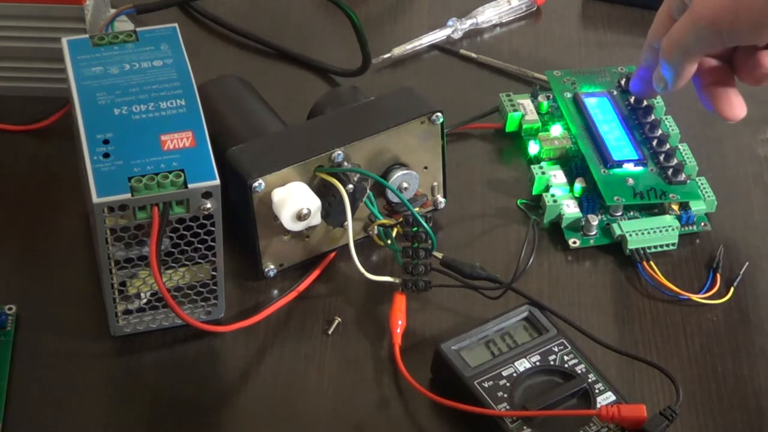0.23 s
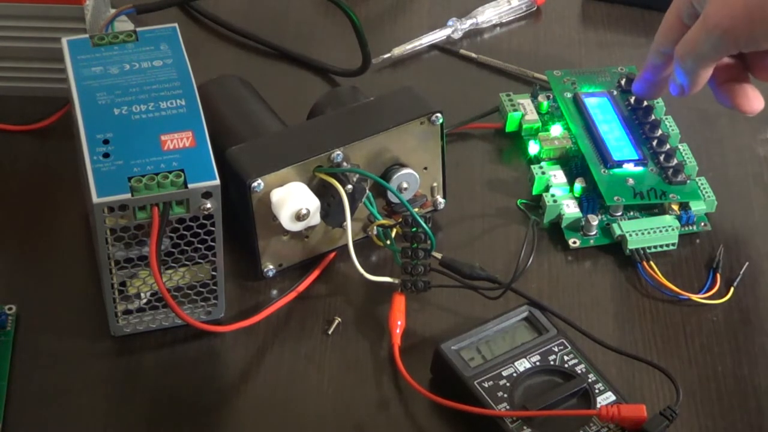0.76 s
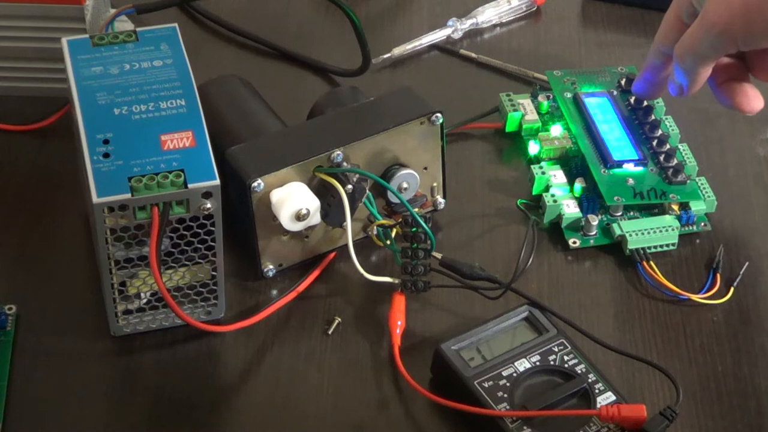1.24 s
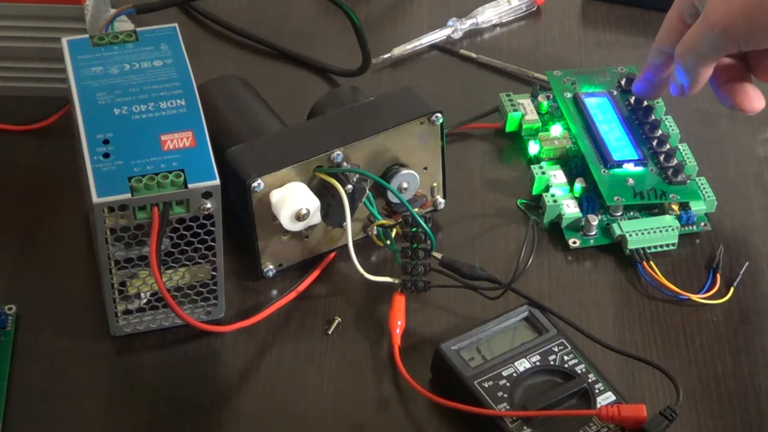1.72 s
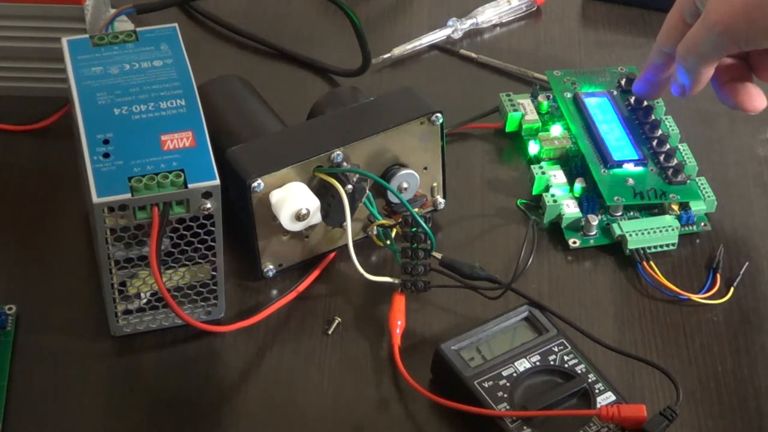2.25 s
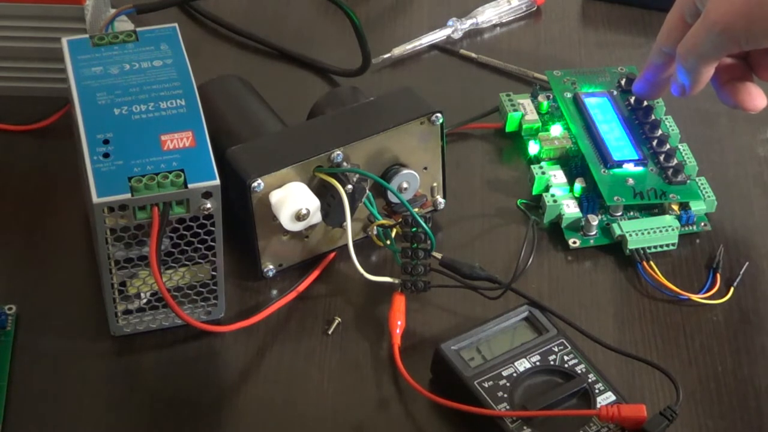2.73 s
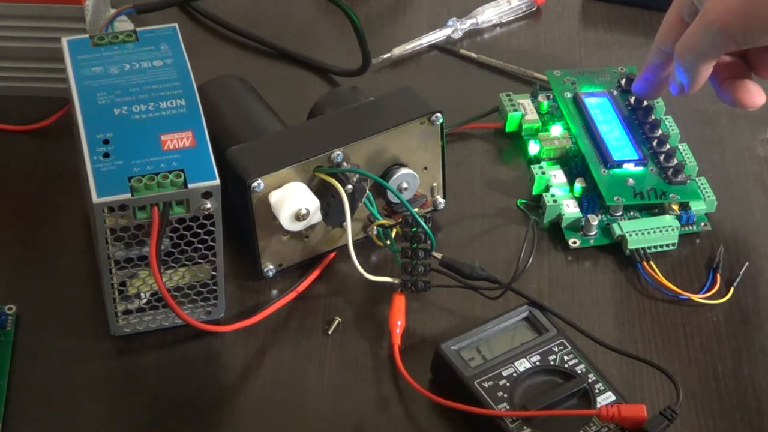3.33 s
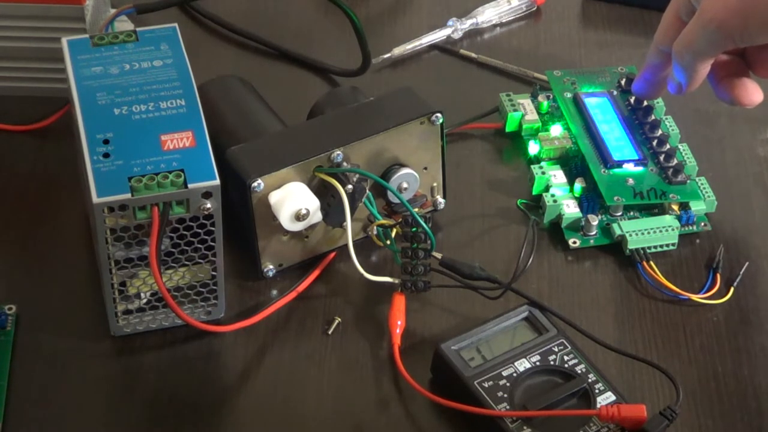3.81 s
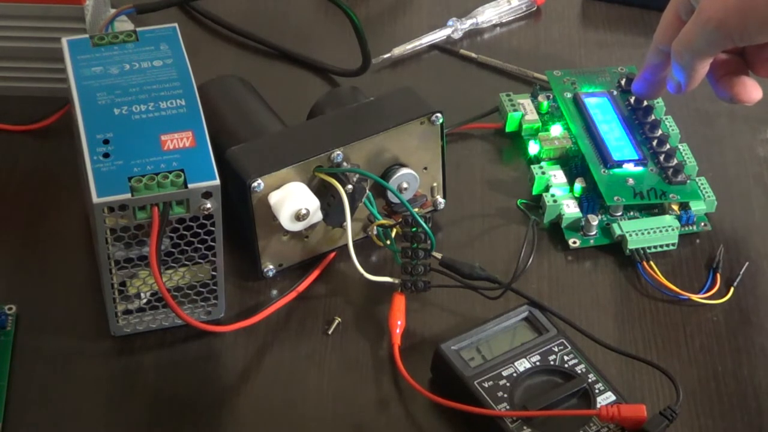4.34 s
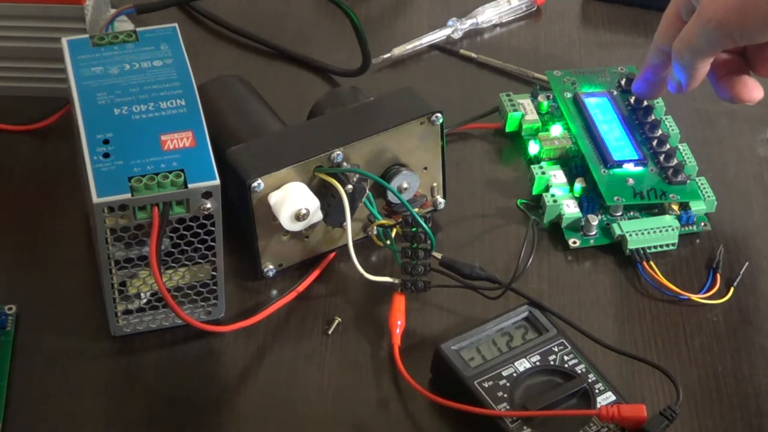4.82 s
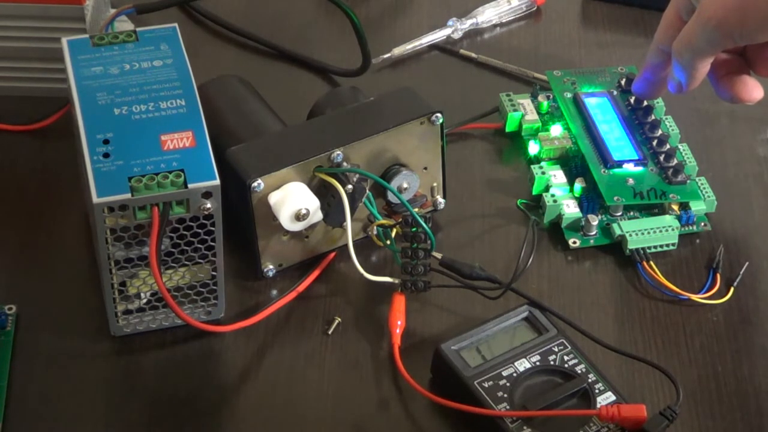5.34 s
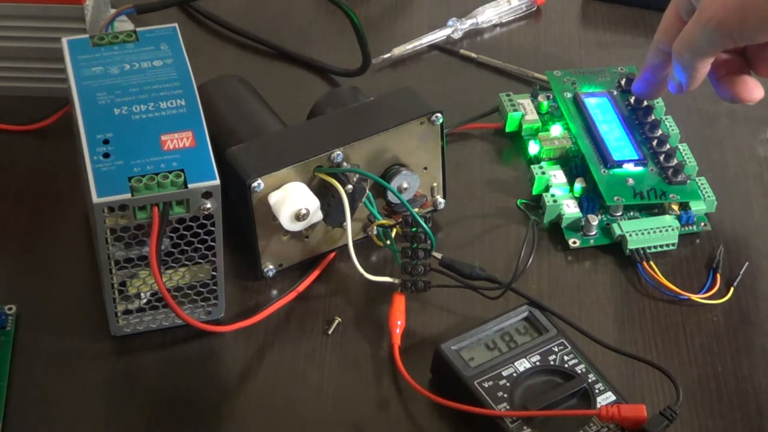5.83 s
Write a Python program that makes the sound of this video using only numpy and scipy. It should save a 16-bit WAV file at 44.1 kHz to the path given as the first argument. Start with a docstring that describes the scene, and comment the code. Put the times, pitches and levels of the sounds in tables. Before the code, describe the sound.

A small electric gear motor starts with a knock, runs with a steady high whine and rattle, then clicks and winds down.

```python
"""On a workbench in a humming room, a small DC gear motor starts with a knock and runs for four seconds.
Its controller chops the current on and off very fast, which makes the coils sing. The gears rattle,
the brushes rasp and squeal on the commutator (the spinning contact), and the shaft's tones sound
through the housing. A sharp click ends the run, the shaft winds down, and a faint whine stays."""
import sys
import numpy as np
from scipy import signal
from scipy.fft import rfft, irfft, next_fast_len
from scipy.io import wavfile
from scipy.ndimage import map_coordinates

SR = 44100
rng = np.random.default_rng(int(sys.argv[2]) if len(sys.argv) > 2 else 0)


def master_out(mix):
    """Clip the mix to full scale and print it as 16-bit PCM to the path in sys.argv[1]."""
    frames = np.transpose(np.atleast_2d(mix))
    ceiling = np.clip(frames, -1, 1)
    pcm = np.round(ceiling * 32767).astype(np.int16)
    wavfile.write(sys.argv[1], SR, pcm)


N = 267907
ON_S, OFF_S = .3855, 4.508  # the power comes on, and starts to fall
TIME = np.arange(N) / SR


def amp(db):
    return 10 ** (np.asarray(db) / 20)

def unit(x):
    return x / np.sqrt(np.mean(x ** 2) + 1e-20)

def since(start):
    return np.maximum(TIME - start, 0)

def rise(start, time_s):
    """A climb from 0 to 1, fast at first and then slower."""
    return 1 - np.exp(-since(start) / time_s)

def decay(start, t60, attack):
    """The loudness of a blow: a quick rise, and a fade of 60 dB in t60 seconds."""
    return amp(-60 * since(start) / t60) * rise(start, attack)

def along(points, hz):
    """Read between the rows of a table, on a log scale."""
    f, v = np.transpose(points)
    return np.interp(np.log(hz + 1), np.log(f + 1), v)

def wobble(rate):
    """A smooth curve through `rate` random values a second."""
    return map_coordinates(rng.standard_normal(int(N * rate / SR) + 4), [TIME * rate])

def filtered(x, gain):
    """Turn each frequency up or down by gain(hz)."""
    m = next_fast_len(N + SR // 2)
    return irfft(rfft(x, m) * gain(np.fft.rfftfreq(m, 1 / SR)), m)[..., :N]

def shaped(x, curve):
    """Filter by a table of (frequency [Hz], gain [dB])."""
    return filtered(x, lambda hz: amp(along(curve, hz)))

def noise(spectrum):
    return unit(shaped(rng.standard_normal(N), spectrum))

def ring(notes, start, attack):
    """A struck object rings with several fading notes at once."""
    return sum(amp(db) * decay(start, t60, attack) * np.sin(2 * np.pi * hz * (TIME - start))
               for hz, db, t60 in notes)

def clatter(rate, spread_db):
    """Tiny random hits of uneven size, about `rate` a second."""
    hits = rng.random(N) < rate / SR
    return unit(hits * rng.standard_normal(N) * amp(spread_db * rng.standard_normal(N)))


# The hush of the room: (frequency [Hz], relative level [dB])
AIR_NOISE = [(12, -49), (20, -12), (115, -10.5), (305, -8), (361, -9), (414, -10.5), (1910, -17.5),
             (4290, -18.5), (13000, -26), (15400, -22)]
# How much that hush differs between the ears: (frequency [Hz], gain [dB])
AIR_WIDTH = [(60, -19), (200, -10), (400, -4), (800, 0.5), (2400, -1), (4400, -6), (8000, 2), (15000, -23)]

def air():
    """Room air: nearly the same in both ears in the bass, all around in the middle range."""
    mid = noise(AIR_NOISE)
    side = shaped(noise(AIR_NOISE), AIR_WIDTH)
    return amp(-54) * np.array([mid + side, mid - side])

# The room's low hum: (frequency [Hz], level [dB])
HUM_TONES = [(120.2, -65.5), (240.4, -69.5), (360.6, -59), (480.8, -75.5)]
# The thin whistle of electronics: (frequency [Hz], level [dB])
WHISTLE_TONES = [(15574, -70), (15622, -64), (15676, -69)]

def hum_and_electronics(chirp_hz=4350):
    """A steady hum, and electronics that whistle and chirp 25 times a second."""
    def tones(table, waver):
        return np.sqrt(2) * sum(amp(db) * np.sin(2 * np.pi * hz * TIME + waver * wobble(3.96))
                                for hz, db in table)
    bursts = np.sin(np.pi * 25 * TIME) ** 6
    chirps = amp(-61) * bursts * np.sin(2 * np.pi * chirp_hz * TIME + wobble(200))
    return tones(HUM_TONES, waver=.21) + tones(WHISTLE_TONES, waver=.1) + chirps

# How long the room echoes: (frequency [Hz], time to fade 60 dB [s])
ROOM_FADE = [(100, 0.45), (300, 0.56), (2000, 0.44), (6000, 0.42), (15000, 0.14)]

def room_echo(x):
    """A wash of echoes for each ear; each frequency dies at its own speed."""
    hz, t, hiss = signal.stft(rng.standard_normal((2, SR // 2)), SR, nperseg=256)
    tail = signal.istft(hiss * amp(-60 * t / along(ROOM_FADE, hz)[:, None]), SR, nperseg=256)[1]
    tail = tail + .4 * tail[::-1]  # both ears hear much the same echoes
    delayed = np.pad(x, (SR // 300, 0))
    return signal.fftconvolve(delayed[None], tail / np.linalg.norm(tail[0]), axes=1)[:, :N]

# How much the bench's echoes differ between the ears: (frequency [Hz], gain [dB])
BENCH_WIDTH = [(50, -28), (150, -18), (350, -12), (1200, -5), (3000, -10.5), (6000, -4), (13000, -38)]

def spread(x, lead_s=.000012):
    """The left ear is slightly nearer; echoes off the bench reach the two ears differently."""
    echoes = rng.standard_normal(SR // 80) * np.linspace(1, 0, SR // 80)
    side = shaped(signal.fftconvolve(x, echoes / np.linalg.norm(echoes))[:N], BENCH_WIDTH)
    lead = lambda hz: np.exp(1j * np.pi * hz * lead_s * np.array([[1], [-1]]) / (1 + (hz / 7000) ** 2))
    return filtered(x, lead) + np.array([side, -side])

def place(x, left_db, lead_rad):
    """Steady tones reach the left ear a little ahead, and louder or softer than the right."""
    sides = np.array([[1], [-1]]) / 2
    return amp(left_db * sides) * filtered(x, lambda hz: np.exp(1j * lead_rad * sides))

# The switch's ring: (frequency [Hz], relative level [dB], time to fade 60 dB [s])
SWITCH_NOTES = [(5900, -1, 0.024), (5820, 4, 0.029), (6780, 0, .03), (8100, -2, 0.018), (10300, -2, 0.013),
                (11600, -1, .006)]
# Its burst of noise: (frequency [Hz], relative level [dB])
SNAP_NOISE = [(1760, -41), (3000, -22), (5920, -7), (8520, -13), (9330, -8), (11700, -2), (13900, -11),
              (16000, -26)]

def switch_click(start=4.5173):
    """A hard, bright contact snaps as the power is cut."""
    snap = amp(-9) * noise(SNAP_NOISE) * decay(start, t60=.011, attack=.0002)
    return amp(-22) * ring(SWITCH_NOTES, start, attack=.0002) + snap

def low_thump(centre_s=.443, width_s=.0026):
    """One low thump with the knock, mostly in the right ear."""
    offset = (TIME - centre_s) / width_s
    return amp([[-29], [-11]]) * offset * np.exp(-offset ** 2 / 2)

# The gears take up their slack: (time [s], ring level [dB], thud level [dB])
GEAR_BLOWS = [(.437, -17, -12), (0.444, -36, -14.5), (0.4542, -37, -20), (0.485, -38, -29)]
# The gearbox rings on the bench: (frequency [Hz], relative level [dB], time to fade 60 dB [s])
BENCH_NOTES = [(113, -8, 0.08), (180, -9, 0.12), (268, -1.5, 0.6), (325.3, -4.5, 0.36), (348, -3, 0.19),
               (449, 0.5, 0.18), (539.6, -7, 0.28), (602, -13, 0.2), (856, -13.5, 0.18), (1050, -9.5, 0.26),
               (1417, -4.5, .06)]
# The dull noise of each blow: (frequency [Hz], relative level [dB])
THUD_NOISE = [(50, -33), (110, -16), (170, -9), (380, 2), (500, -3.5), (800, -15.5), (1400, -14.5),
              (2100, -23.5), (3500, -25), (6000, -34), (15000, -59)]

def gear_knock():
    """The gears slam home: a brief hard contact, a dull rattle, and the gearbox rocking on the bench."""
    sound = np.zeros(N)
    for start, ring_db, thud_db in GEAR_BLOWS:
        contact = decay(start, t60=.02, attack=.0012)
        rattle = decay(start, t60=.047, attack=.00065)
        sound += amp(thud_db) * noise(THUD_NOISE) * (contact + rattle)
        sound += amp(ring_db) * ring(BENCH_NOTES, start, attack=.0011)
    return sound

# The coils' tones: (multiple of the chopping rate, level at full current [dB], holding level [dB],
# how strongly the tone follows the current [exponent])
COIL_TONES = [(1, -37, -55, 1.3), (2, -53.5, -65, 0.81), (3, -50, -72, .45), (4, -67, -71, 1.0)]

def coil_whine(chop_hz=3438.7, flutter=.048):
    """Chopped current makes the coils sing; a weak holding current remains after the stop."""
    ramp_down = np.maximum(1 - since(OFF_S) / .34, 0)
    current = (.4 + .6 * rise(ON_S, time_s=.47)) * ramp_down
    whine = np.zeros(N)
    for k, drive_db, hold_db, power in COIL_TONES:
        level = amp(drive_db) * current ** power * (1 + flutter * wobble(40)) + amp(hold_db)
        whine += level * np.sin(2 * np.pi * k * chop_hz * TIME)
    return np.sqrt(2) * (TIME > ON_S) * whine

def coasting(stop_s=.34):
    """The share of speed left as friction stops the shaft, more gently towards the end."""
    return np.maximum(1 - since(OFF_S) / stop_s, 0) ** 1.25

def braking():
    """How hard the gears push back while the shaft winds down (0 to 1)."""
    return .77 * rise(OFF_S, time_s=.027)

def shaft_speed(run_hz=63.615, extra_hz=.16, settle_at_s=2.07):
    """Turns per second: a quick start, a slightly fast run that settles, a coast to rest."""
    extra = extra_hz * (1 - np.tanh((TIME - settle_at_s) / .12)) / 2
    return (run_hz + extra) * rise(ON_S, time_s=.03) * coasting()

def loudness(run_db, swell_db, swell_s, fade_power, brake_db):
    """A part of the motor's sound starts at once, swells to run_db, then fades with the speed."""
    db = run_db - swell_db * (1 - rise(ON_S, swell_s)) + brake_db * braking()
    return (TIME > ON_S) * amp(db) * coasting() ** fade_power

def brush_squeal(pitch_hz=3275):
    """The brushes chatter on the commutator in one wandering tone, which beats against the whine."""
    level = loudness(run_db=-39, swell_db=4, swell_s=.9, fade_power=.9, brake_db=-4)
    level *= amp(2.5 * wobble(18))
    return np.sqrt(2) * level * np.sin(2 * np.pi * pitch_hz * TIME + .8 * wobble(45) + 3 * wobble(6))

def low_pass(hz, split_hz=2300):
    """The gears fill the range below the split, the brushes the range above."""
    return 1 / np.sqrt(1 + (hz / split_hz) ** 8)

def gear_rattle(turns, speed):
    """The roughness lies along the teeth, so the rattle sinks in pitch as the shaft slows."""
    teeth = amp(-28.5) * clatter(rate=900, spread_db=2.5) + amp(-29) * rng.standard_normal(N)
    rattle = map_coordinates(filtered(teeth, low_pass), [turns * SR / speed.max()])
    level = loudness(run_db=-.28, swell_db=2.5, swell_s=.7, fade_power=.63, brake_db=2)
    return rattle * level * amp(.36 * wobble(14))

def brush_rasp(turns, throb=.31):
    """Two sparking brushes spit at switch-on, then make a rasp that swells twice a turn."""
    sparks = amp(-30.5) * clatter(rate=1500, spread_db=4) + amp(-29.5) * rng.standard_normal(N)
    level = loudness(run_db=0, swell_db=5, swell_s=.53, fade_power=1.3, brake_db=-2)
    flicker = amp(.98 * wobble(16) + wobble(90))
    rasp = sparks * (1 + throb * np.cos(4 * np.pi * turns)) * level * flicker
    spit = amp(-26.5) * rng.standard_normal(N) * decay(ON_S, t60=.03, attack=.0003)
    return filtered(rasp + spit, lambda hz: np.sqrt(1 - low_pass(hz) ** 2))

# Tones of the commutator and gears: (multiple of the shaft speed, relative level [dB])
SHAFT_TONES = [(3, -52), (7, -51), (10, -33), (14, -57), (20, -41), (30, -42), (40, -42), (49, -54),
               (60, -50), (72, -54), (80, -42), (81, -54), (82, -45), (83, -52), (84, -40), (85, -53),
               (86, -53), (88, -47), (89, -52), (90, -47), (98, -47), (99, -50), (100, -40), (110, -47),
               (112, -52), (116, -52), (159, -48), (195, -49)]
# How braking changes them: (multiple of the shaft speed, change at full braking [dB])
BRAKE_CHANGE = [(10, -1), (20, 5), (30, 5), (40, -5), (80, -8)]

def shaft_tones(turns):
    """Ten commutator bars, the gear teeth and the scratches under the brushes repeat with each turn."""
    brake = braking()
    tones = np.zeros(N)
    for k, db in SHAFT_TONES:
        strength = amp(db + brake * along(BRAKE_CHANGE, k)) * (1 + .12 * wobble(7))
        phase = 2 * np.pi * (k * turns + rng.random())
        looseness = .7 * brake * wobble(90)  # loose teeth roughen the tone under braking
        tones += strength * np.sin(phase + looseness)
    # the scratches add many high, close tones, the even multiples stronger
    multiple = np.arange(1025)
    present = (multiple > 100) * (multiple < 225) * ~np.isin(multiple, np.transpose(SHAFT_TONES)[0])
    size = present * amp(-7 * (multiple % 2) + rng.standard_normal(len(multiple)))
    one_turn = unit(irfft(size * np.exp(2j * np.pi * rng.random(len(multiple)))))
    scratches = map_coordinates(one_turn, [turns % 1 * len(one_turn)], mode="grid-wrap")
    level = loudness(run_db=0, swell_db=8, swell_s=.85, fade_power=.83, brake_db=-5)
    level *= rise(ON_S, time_s=.063)  # the tones build as the shaft comes up to speed
    return level * (np.sqrt(2) * tones + amp(-32 - 10 * brake) * scratches)

# How well the motor's case passes sound: (frequency [Hz], gain [dB])
HOUSING_CURVE = [(30, -15.5), (130, -11), (200, -12.5), (550, -10), (760, -10), (1000, -2), (2100, -7),
                 (4000, -3), (6500, -11.5), (9000, -17), (11500, -16.5), (14500, -26), (16000, -28)]
# Where its panels ring: (frequency [Hz], width [Hz], boost [dB])
PANEL_PEAKS = [(285, 185, 13.6), (416, 90, 6.6), (669, 75, 6.9), (849, 88, 9.6), (1123, 142, 1.1),
               (1423, 89, 6.5), (1628, 75, 10.4), (1702, 39, 9.8), (2339, 98, 8.8), (2638, 107, 4.7),
               (2917, 103, 8.3), (3150, 105, 6.9), (3292, 113, 15.7), (3506, 150, 9.7), (3696, 116, 10.7),
               (4355, 132, 8.2), (5216, 331, 8.0), (5774, 100, 4.9), (7364, 859, 5.5), (10169, 804, 5.7)]

def housing(hz):
    """The motor's case and gearbox colour the sound with a broad slope and ringing panels."""
    peaks_db = sum(db / (1 + (2 * (hz - centre) / width) ** 4) for centre, width, db in PANEL_PEAKS)
    cepstrum = irfft(np.log(amp(along(HOUSING_CURVE, hz) + peaks_db)))
    half = len(cepstrum) // 2
    # folding onto the first half makes the panels ring after a hit, never before it
    return np.exp(rfft(np.r_[cepstrum[0], 2 * cepstrum[1:half], np.zeros(half)]))

def motor():
    """The turning shaft makes a rattle and a set of tones, both heard through the housing."""
    speed = shaft_speed()
    turns = np.cumsum(speed) / SR
    rattle = gear_rattle(turns, speed) + brush_rasp(turns)
    return filtered(np.array([rattle, shaft_tones(turns)]), lambda hz: housing(hz) * hz / (hz + 10))

def scene():
    """Motor, knock and click on the bench; the room echoes the rattle, the knock and the click."""
    rattle, tones = motor()
    knock, click = gear_knock(), switch_click()
    steady = place(tones + brush_squeal() + hum_and_electronics(), left_db=1.5, lead_rad=.39)
    whine = place(coil_whine(), left_db=-2.5, lead_rad=.12)
    echo = room_echo(amp(-8.5) * rattle + amp(-12) * knock + amp(-3.5) * click)
    return spread(amp(-.7) * rattle + knock + click) + steady + whine + low_thump() + echo + air()

def record(dry, top_hz=15850):
    """The very highest treble is cut away."""
    return filtered(dry, lambda hz: hz < top_hz)


dry = scene()
out = record(dry)
master_out(out)
```